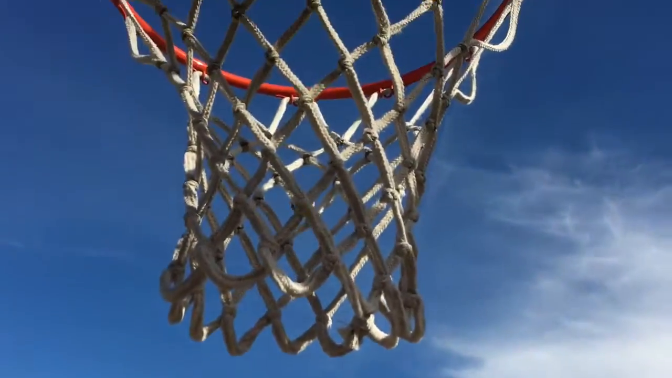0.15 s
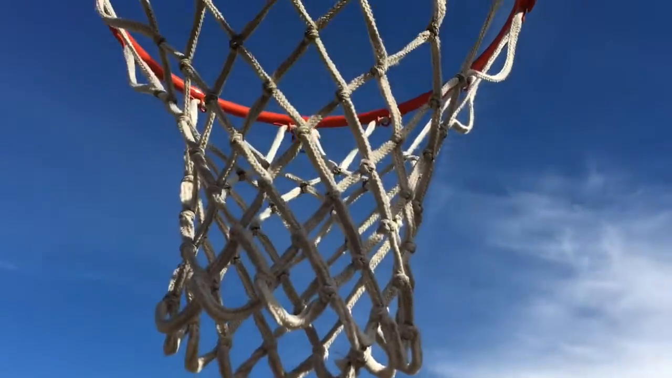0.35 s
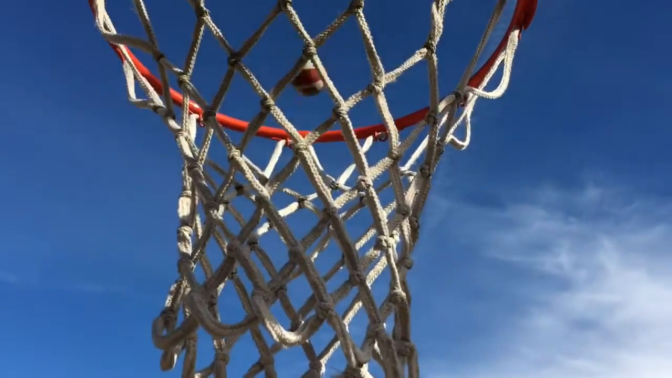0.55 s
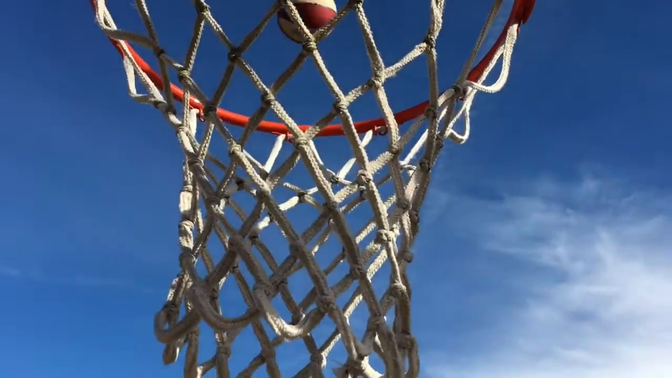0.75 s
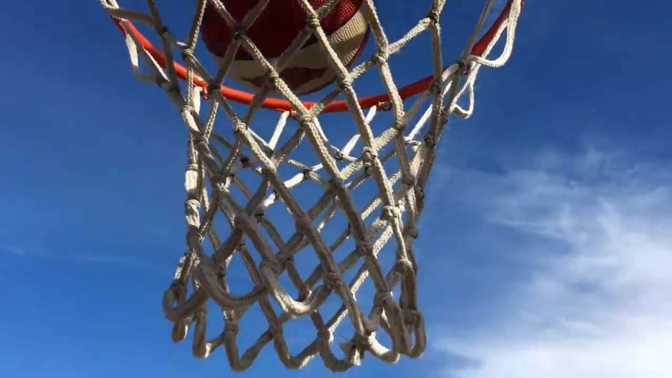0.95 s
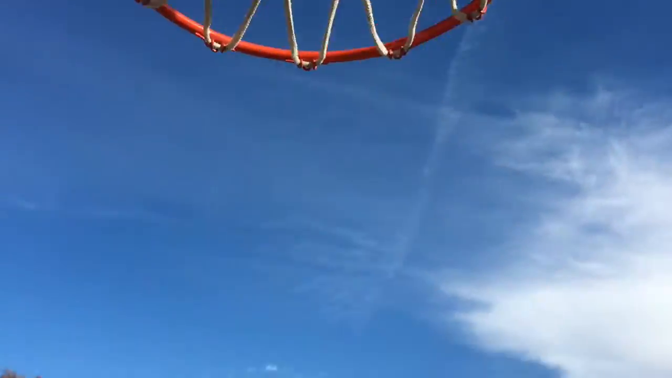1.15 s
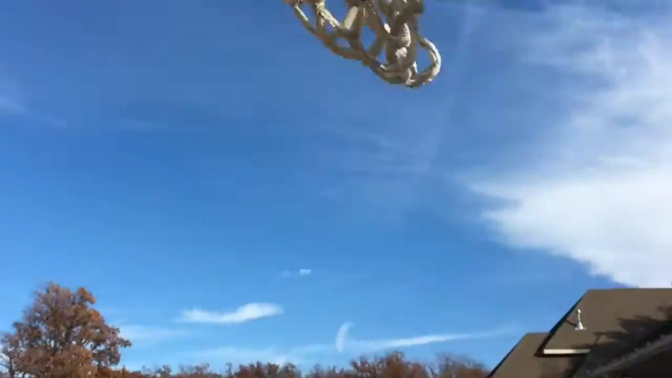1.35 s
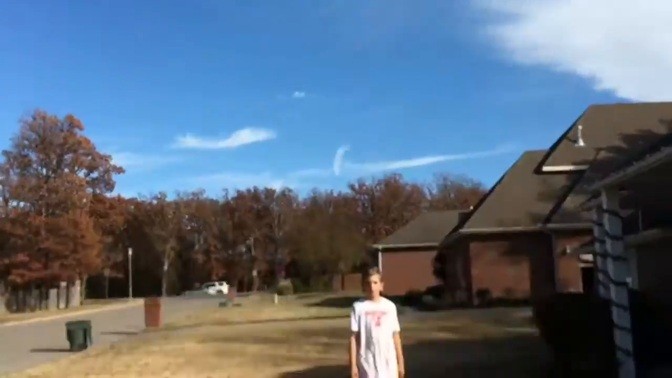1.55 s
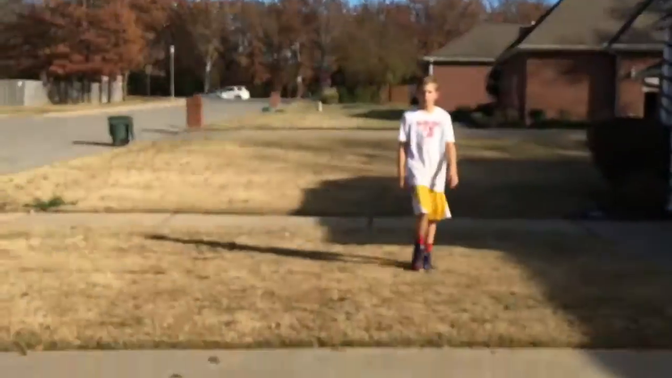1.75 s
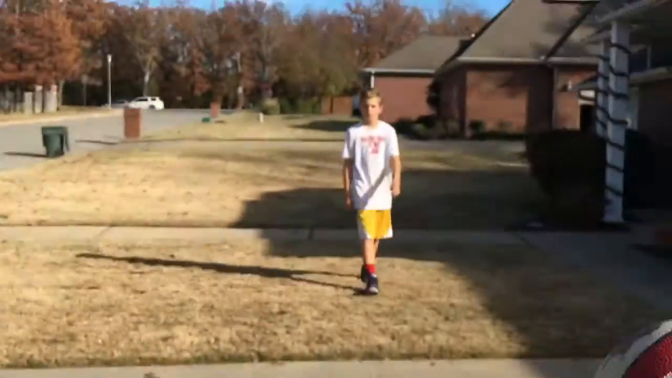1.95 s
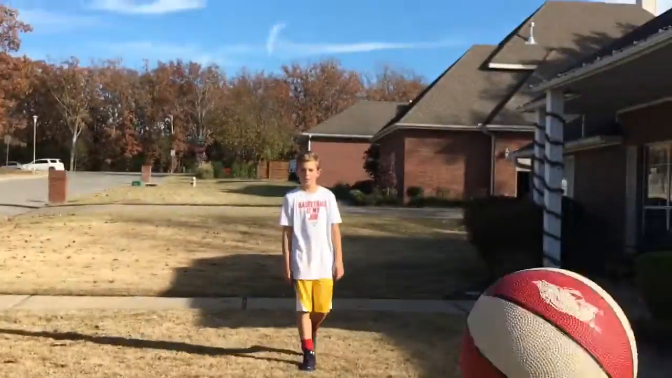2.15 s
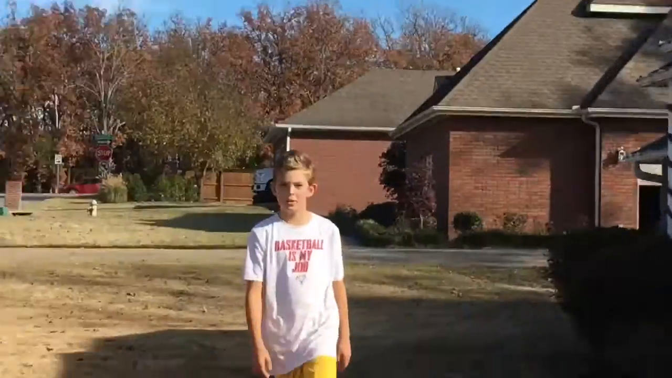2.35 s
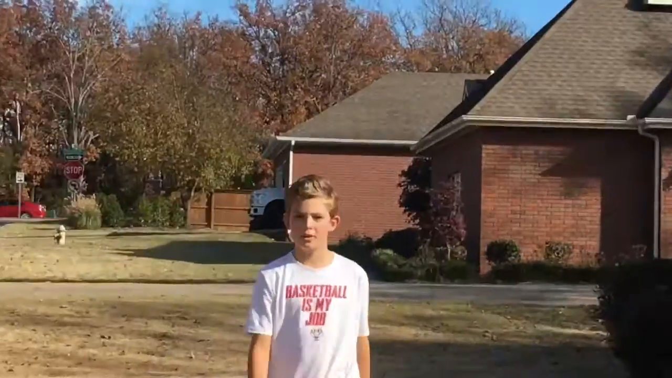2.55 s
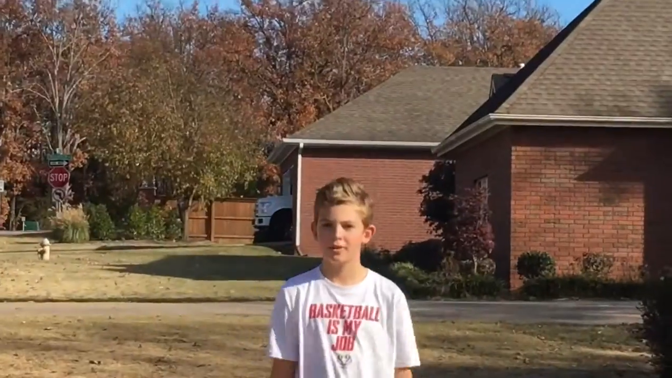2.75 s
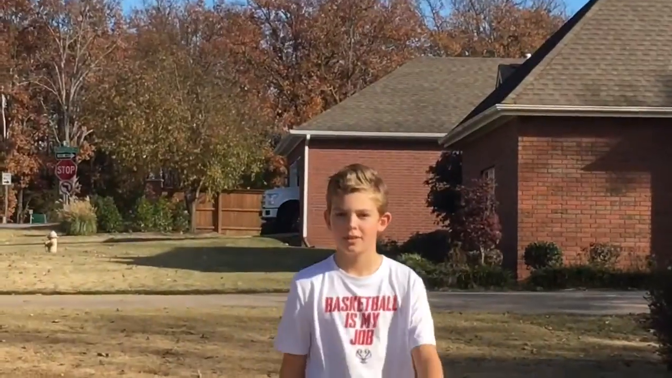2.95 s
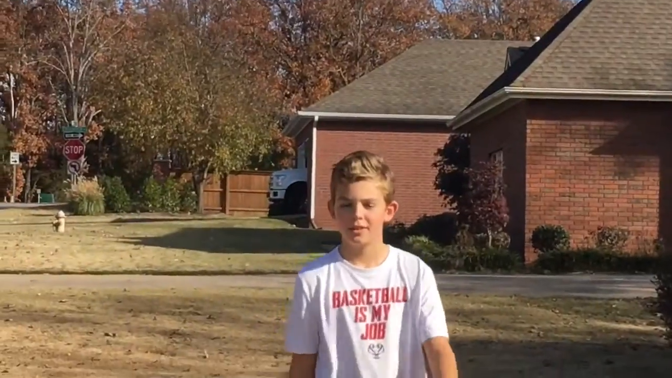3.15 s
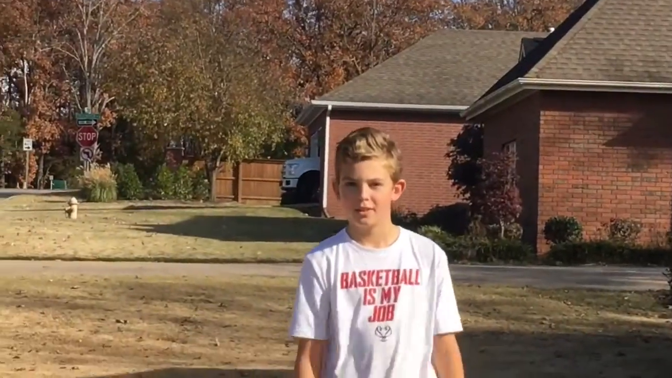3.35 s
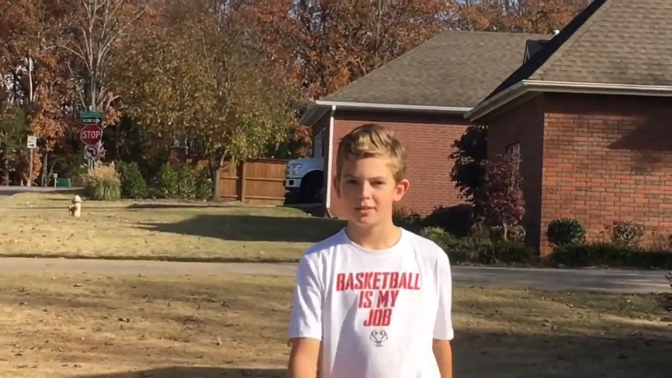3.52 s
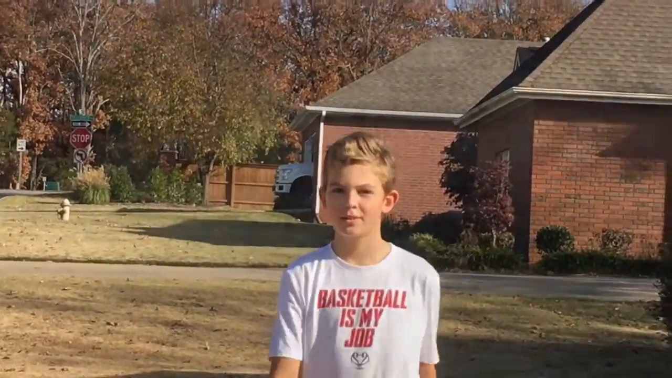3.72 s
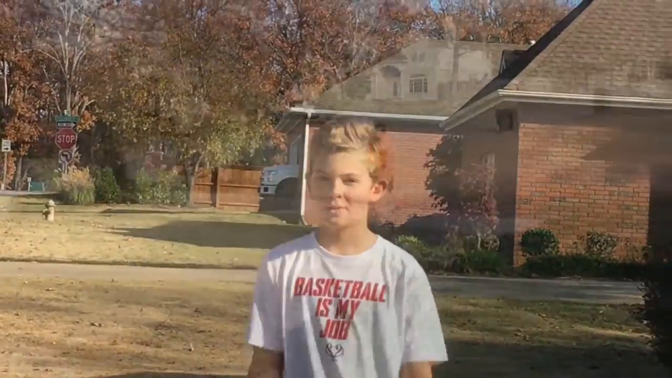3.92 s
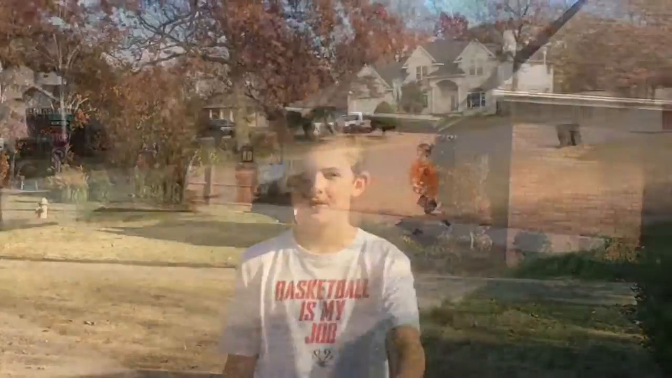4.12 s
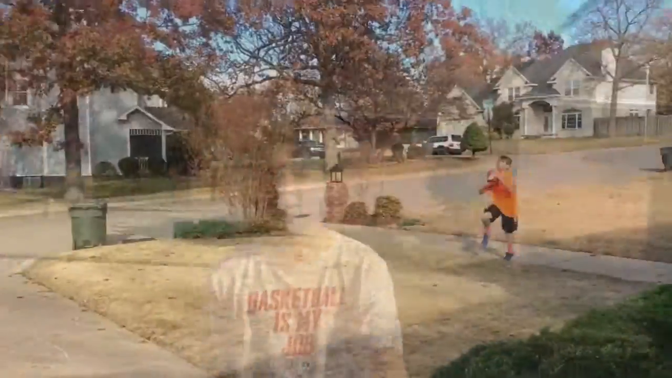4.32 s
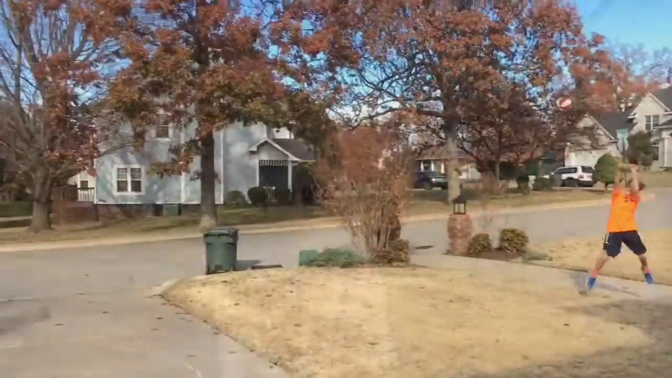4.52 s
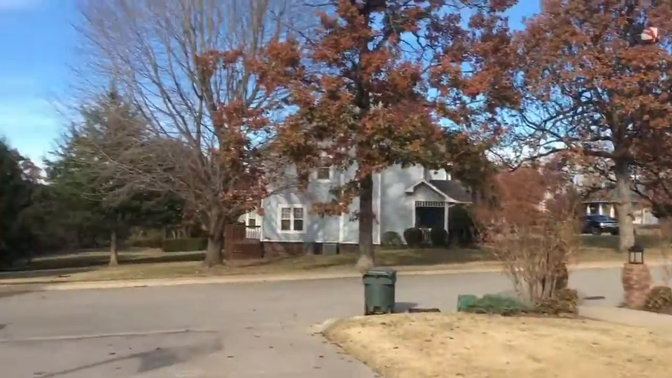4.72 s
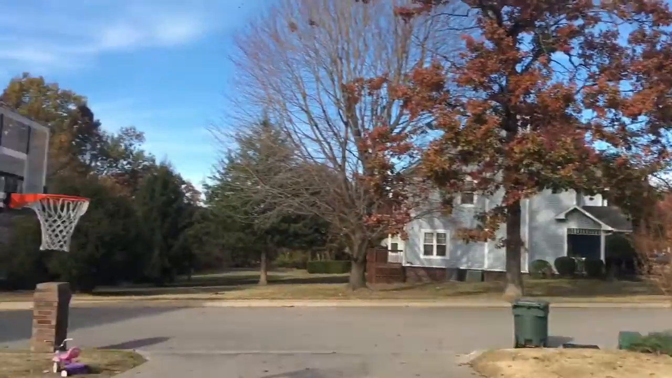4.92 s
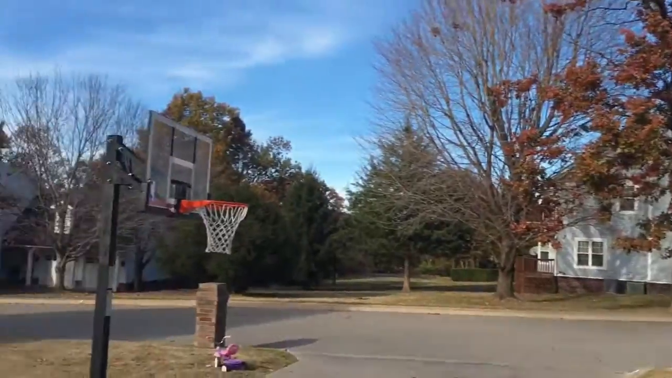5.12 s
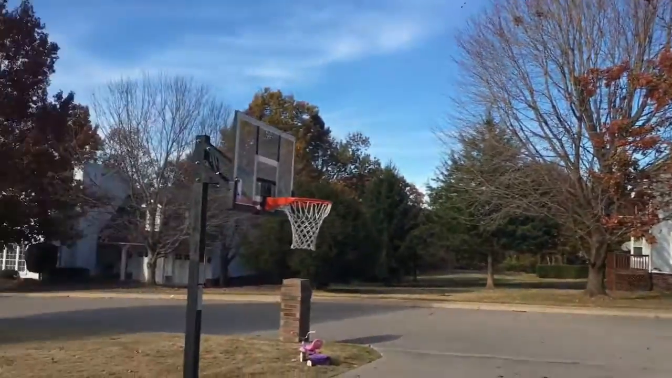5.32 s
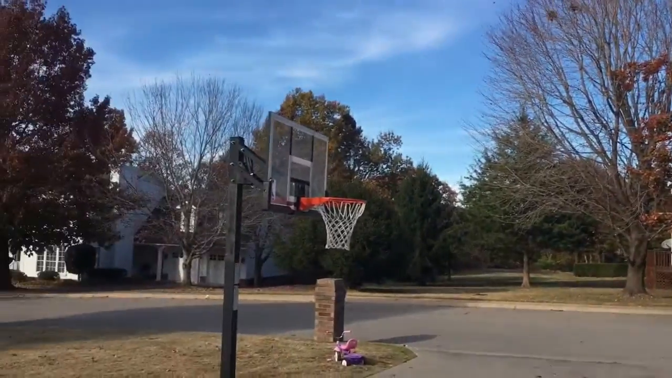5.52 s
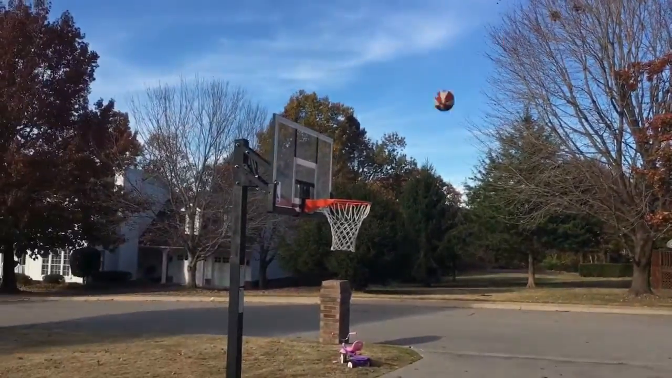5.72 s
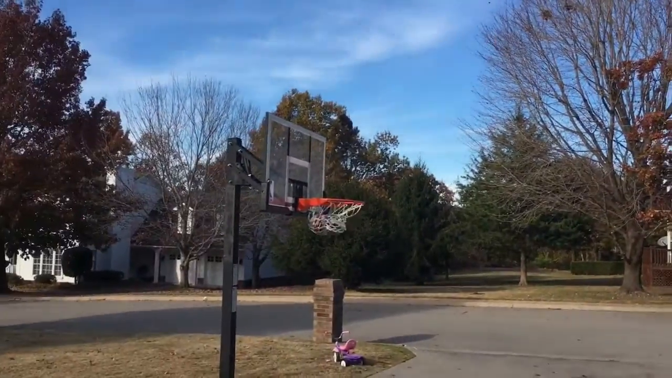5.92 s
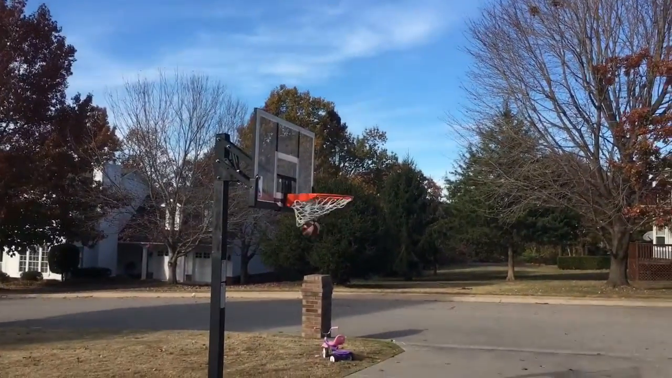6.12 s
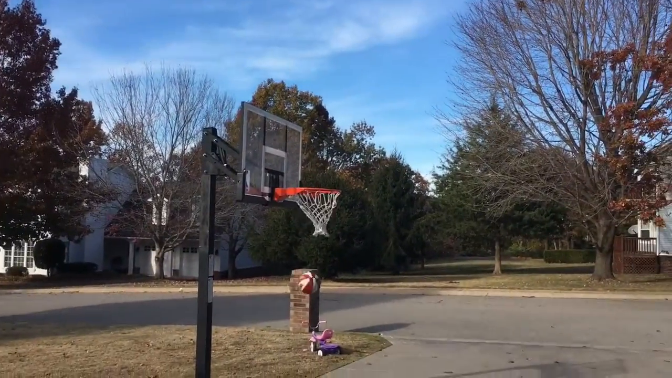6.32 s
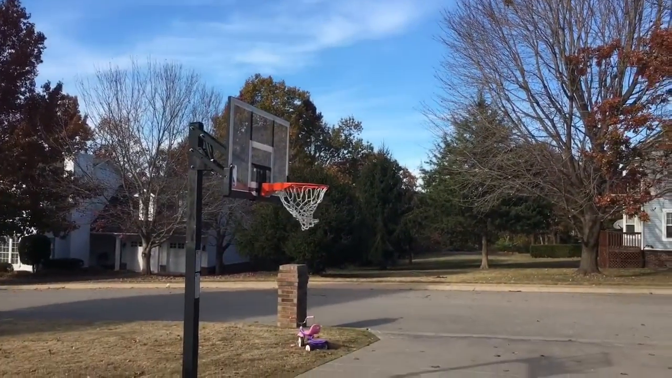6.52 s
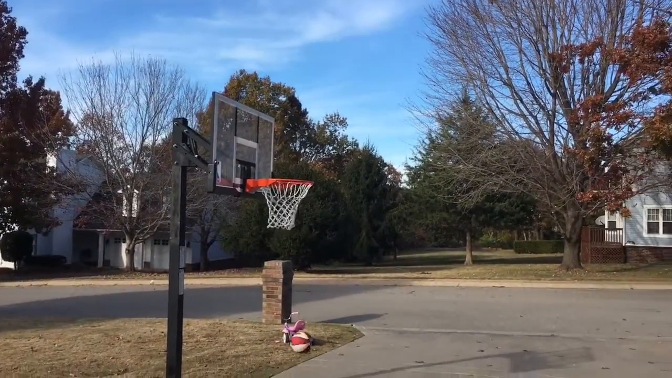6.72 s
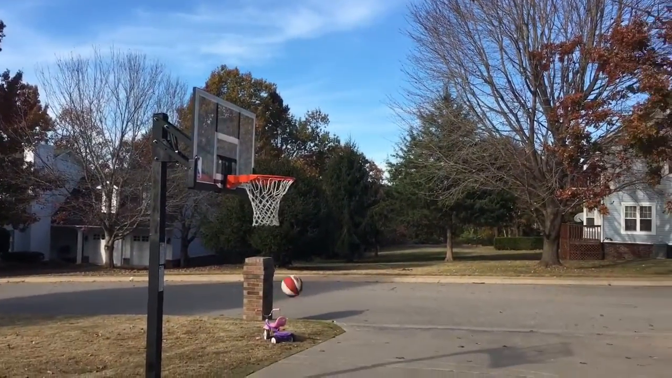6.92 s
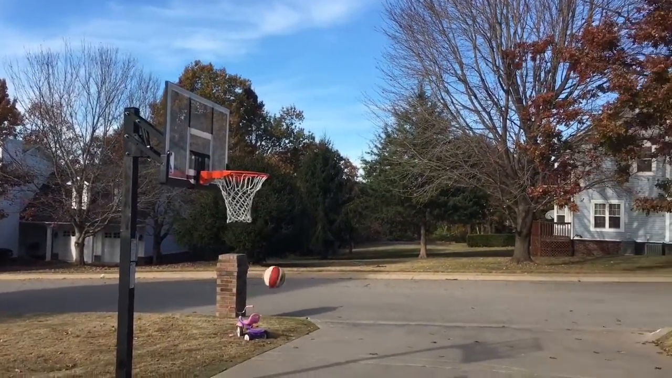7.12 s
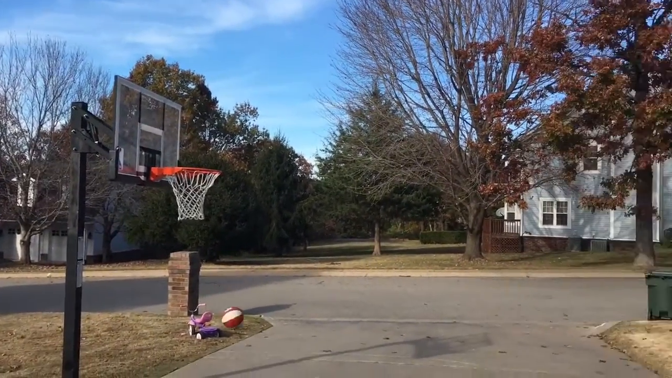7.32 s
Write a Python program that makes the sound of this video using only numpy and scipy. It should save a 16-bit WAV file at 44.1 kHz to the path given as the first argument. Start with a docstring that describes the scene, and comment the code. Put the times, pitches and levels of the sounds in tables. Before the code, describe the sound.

Outdoors, a ball bangs a rim and swishes its net, slaps concrete in quickening bounces, then a fainter hoop rattle and one sharp bounce follow.

```python
"""Wind, traffic, a far motor and a patchy treble hiss are shaped noise throughout; a bird's sliding sine
opens the scene. A basketball strikes a driveway hoop: noise and blows excite rim, net and board, and a
stick-slip squeak sounds. It bounces four times on the concrete, each a slap, air modes and a falling thud,
answered by house walls; thin hoop tones swell around the first bounce, shoes scuff around the fourth.
A weaker second shot then rattles rim and net, bounces once, and is followed by one last scuff."""
import sys
import numpy as np
from scipy import signal
from scipy.fft import rfft, irfft, next_fast_len
from scipy.io import wavfile
from scipy.ndimage import map_coordinates

SR = 44100
rng = np.random.default_rng(int(sys.argv[2]) if len(sys.argv) > 2 else 0)


def transcribe(u):
    """Save the signal u as a 16-bit wav file named by the first command-line argument.

    u: samples, shape (n,) or (channels, n), limited to [-1, 1]; the rate is SR.
    q: integer samples, one column per channel.
    """
    v = np.clip(np.atleast_2d(u).T, -1, 1)
    q = np.round(v * 32767).astype(np.int16)
    wavfile.write(sys.argv[1], SR, q)


N = 325017  # samples


def amp(db):
    """Decibel law: level to amplitude ratio."""
    return 10 ** (np.asarray(db) / 20)


def unit(x):
    """Normalisation to unit root-mean-square amplitude."""
    return x / np.sqrt(np.mean(x ** 2) + 1e-20)


def along(points, hz):
    """Interpolation of (f/Hz, value) points on a logarithmic frequency axis."""
    f, v = np.transpose(points)
    return np.interp(np.log(hz + 1), np.log(f + 1), v)


def gains(rows):
    """Level interpolation in time: one gain curve for each dB column."""
    times, *columns = np.transpose(rows)
    return [amp(np.interp(np.arange(N) / SR, times, levels)) for levels in columns]


def wobble(rate):
    """Random modulation: a smooth curve through `rate` random knots a second."""
    knots = rng.standard_normal(int(N * rate / SR) + 4)
    return map_coordinates(knots, [np.arange(N) * rate / SR])


def filtered(x, response):
    """Linear filtering: the spectrum is multiplied by a frequency response."""
    m = next_fast_len(len(x) + SR // 4)
    spectrum = rfft(x, m) * response(np.fft.rfftfreq(m, 1 / SR))
    return irfft(spectrum, m)[:len(x)]


def shape(points):
    """Spectral envelope drawn through (f/Hz, level/dB) points."""
    return lambda hz: amp(along(points, hz))


def resonant(peaks):
    """Modal superposition: second-order resonances of alternating sign, (f/Hz, width/Hz, level/dB)."""
    def response(f):
        return sum((-1) ** k * amp(db) * 1j * f * width / (centre * centre - f * f + 1j * f * width)
                   for k, (centre, width, db) in enumerate(peaks))
    return response


def noise(response):
    """Coloured noise: filtered white noise of unit rms."""
    return unit(filtered(rng.standard_normal(N), response))


def ring(modes, t):
    """Free vibration: exponentially damped modes, with new strengths at every call."""
    return sum(amp(db + rng.normal(0, 2.) - 60 * t / t60) * np.sin(2 * np.pi * hz * t)
               for hz, db, t60 in modes)


def burst(s, rise, hold, t60):
    """Transient envelope: quadratic rise, hold, then exponential decay by 60 dB in t60."""
    t = np.arange(N) / SR - s
    decay = amp(-60 * np.clip(t - rise - hold, 0, None) / t60)
    return np.clip(t / rise, 0, 1) ** 2 * decay


def add(track, s, sound):
    """Superposition: a sound is summed into the track from time s."""
    part = track[round(s * SR):][:len(sound)]
    part += sound[:len(part)]


# spectrum of wind on the microphone: f/Hz, level/dB
WIND_SPECTRUM = [(12, -19), (22, -14.5), (36, 0), (64, 3), (120, -4.5), (172, -12.5), (204, -15),
                 (300, -31), (400, -55.5)]


def wind():
    """Turbulence: low-frequency noise in irregular lumps."""
    return unit(amp(2.4 * wobble(11)) * noise(shape(WIND_SPECTRUM)))


# resonances of a far motor: f/Hz, width/Hz, level/dB
MOTOR_RESONANCES = [(108, 25, 2), (208, 28, -0.5), (232, 30, -3), (298.5, 8.3, -6.5)]


def motor():
    """Narrow-band noise: each resonance, squared, selects a humming band."""
    def line(hz, width):
        return noise(lambda f: resonant([(hz, width, 0)])(f) ** 2)
    return unit(sum(amp(db) * line(hz, width) for hz, width, db in MOTOR_RESONANCES))


# spectrum of distant traffic: f/Hz, level/dB
TRAFFIC_SPECTRUM = [(150, -26), (250, 0), (513, -7.5), (624, -2.5), (770, -3), (868, 0), (1340, -3),
                    (2100, -9), (2920, -17.5), (3200, -16), (9000, -35), (11700, -56.5), (19800, -120)]


def traffic():
    """Broad-band noise: a wash of distant traffic whose level fluctuates slowly."""
    return amp(.7 * wobble(6)) * noise(shape(TRAFFIC_SPECTRUM))


# spectrum of the treble hiss: f/Hz, level/dB
HISS_SPECTRUM = [(2350, -20), (4000, -2), (5500, -3), (9300, -3.5), (10400, -9), (11400, -5.5),
                 (14000, -6.5), (16000, -7)]
# patches of stronger hiss: start t/s, length t/s, level/dB
HISS_PATCHES = [(0, 0.08, -74), (0.236, 0.093, -68.5), (0.791, 0.041, -70), (1.273, .27, -58),
                (1.74, 0.31, -63.5), (2.546, 0.74, -68.5), (3.085, 0.084, -72), (3.45, 0.33, -68),
                (4.796, 0.357, -67), (5.173, 0.99, -76), (6.693, 0.38, -66.5), (7.266, 0.24, -69.5)]
HISS_BED_DB, HISS_EDGE_S, HISS_T60 = -81.5, 0.017, .2  # dB, rise in s, decay in s


def hiss():
    """Amplitude-modulated noise: treble hiss comes and goes in patches over a faint bed."""
    level = amp(HISS_BED_DB)
    for s, long, db in HISS_PATCHES:
        level = level + amp(db) * burst(s - HISS_EDGE_S, HISS_EDGE_S, long, HISS_T60)
    return level * amp(0.57 * wobble(8.7)) * noise(shape(HISS_SPECTRUM))


# course of the background: t/s, wind level/dB, far motor level/dB, traffic level/dB
AIR_LEVELS = [(0, -41.5, -52, -51.5), (.3, -43, -46.5, -53), (.7, -42, -51, -53.5),
              (1.0, -42, -47.5, -54.5), (1.6, -43, -58.5, -53.5), (2.15, -40, -50, -53.5),
              (2.6, -48.5, -54, -53), (3.3, -49, -58.5, -54), (3.7, -43, -53, -53), (4.1, -51, -66, -57.5),
              (4.6, -44, -71, -54.5), (5.6, -45.5, -72.5, -55.5), (6.7, -43, -56, -56),
              (7.37, -48.5, -69.5, -57.5)]


def street():
    """Incoherent superposition of the background sources, each at its own level."""
    wind_gain, motor_gain, traffic_gain = gains(AIR_LEVELS)
    return wind_gain * wind() + motor_gain * motor() + traffic_gain * traffic() + hiss()


# a far bird's falling note: start t/s, length t/s, from f/Hz, to f/Hz, level/dB
BIRD_NOTE = (0, .21, 5800, 5350, -72)


def bird():
    """Frequency modulation: one unsteady whistle slides down."""
    s, long, from_hz, to_hz, db = BIRD_NOTE
    u = np.clip((np.arange(N) / SR - s) / long, 0, 1)
    pitch = (from_hz + (to_hz - from_hz) * u) * (1 + .015 * wobble(250))
    phase = 2 * np.pi * np.cumsum(pitch) / SR
    return amp(db + 3 * wobble(40)) * (1 - u ** 4) * np.sin(phase)


# wall echoes: delay t/s, level/dB
WALL_ECHOES = [(.0035, -34.5), (.009, -35), (.019, -47.5), (.034, -48), (.046, -49), (.073, -49)]
# decay of the yard by band: f/Hz, t60/s
YARD_DECAY = [(150, 0.119), (1000, 0.216), (4000, 0.37), (12000, 0.19)]


def yard(x):
    """Reverberation: convolution with wall echoes and scattered noise that decays by band."""
    hz, t, z = signal.stft(rng.standard_normal(SR // 2), SR, nperseg=256)
    decay = amp(-60 * t / along(YARD_DECAY, hz)[:, None])
    tail = signal.istft(z * decay, SR, nperseg=256)[1]
    t = np.arange(len(tail)) / SR
    rough = rng.standard_normal(len(t))
    lumps = amp(-14 + 2.5 * wobble(146.0)[:len(t)])
    onset = np.clip((t - .029) / 0.0045, .5, 1)  # half strength, then full with the main wall
    tail = lumps * tail / np.linalg.norm(tail) * onset
    tail += sum(amp(db) * rough * np.exp(-((t - s) / 0.00079) ** 2) for s, db in WALL_ECHOES)
    return signal.fftconvolve(x, tail)[:N]


def echoes(x):
    """Reverberation: each bounce gets the same wall delays, with the noise freshly drawn."""
    out = np.zeros(N)
    for s, *_ in BALL_BOUNCES:
        start = s - .01
        add(out, start, yard(x[round(start * SR):][:SR // 5]))
    return out


# shoe scuffs and ticks: t/s, treble level/dB, body level/dB, length t/s
SHOE_SCUFFS = [(3.85, -79, -58.5, 0.0011), (4.222, -63, -70, 0.00108), (4.2622, -46.5, -56, 0.044),
               (4.556, -66, -61.5, 0.00096), (4.583, -53, -46.5, 0.00069), (6.862, -75, -49, 0.0053)]


def scuffs():
    """Sliding friction: short gritty scrapes over a duller body."""
    grit = sum(amp(db) * burst(s, 0.000578, long, 0.0096) for s, db, _, long in SHOE_SCUFFS)
    sole = sum(amp(db) * burst(s, 0.00071, long, 0.021) for s, _, db, long in SHOE_SCUFFS)
    # f/Hz, level/dB
    treble = [(2000, -15.5), (4500, -7), (6000, 2.5), (9500, -4.0), (11000, -9.0), (16000, -9)]
    body = [(500, -27), (1500, 9.5), (3000, 6), (5000, 0), (9000, -16), (14000, -40)]
    grain = amp(1.4 * wobble(300)) * noise(shape(treble))
    return grit * grain + sole * noise(shape(body))


# thin tones of the steel: f/Hz, level/dB
STEEL_TONES = [(3760, -1), (4620, -3), (5360, -8), (5830, -3), (6200, -8), (7420, -7), (8530, -7)]
# their swells: start t/s, length t/s, level/dB, brightness in dB per octave about 5 kHz
TONE_SWELLS = [(1.33, .22, -63, -1), (1.8, .42, -65, -5)]


def tones():
    """Narrow-band resonance: the shaken hoop's broken tones swell and fade."""
    out = np.zeros(N)
    for hz, level_db in STEEL_TONES:
        line = noise(resonant([(hz, 12, 0)]))  # 12 Hz wide
        for s, long, db, bright_db in TONE_SWELLS:
            u = np.arange(round(long * SR)) / (long * SR)
            gain = amp(db + level_db + bright_db * np.log2(hz / 5000))
            swell = np.sin(np.pi * u ** .6)
            add(out, s, gain * swell * line[round(s * SR):][:len(u)])
    return out


# squeaks of rubber on steel: t/s, level/dB, rise t/s
RUBBER_SQUEAKS = [(1.078, -9, .009), (1.272, -44, 0.025)]
# overtones of the squeak: multiple of the fundamental, level/dB
SQUEAK_OVERTONES = [(1, 0), (2, -7), (3, -18.5)]
SQUEAK_HZ, SQUEAK_HOLD, SQUEAK_T60 = 3140, .002, .028  # mean pitch in Hz, grip in s, release in s
CHATTER_DB, CHATTER_S = -17, .022  # weaker slipping relative to the squeal, its hold in s


def squeak():
    """Stick-slip oscillation: an unsteady harmonic squeal, outlasted by weaker chatter."""
    phase = 2 * np.pi * np.cumsum(SQUEAK_HZ * (1 + 0.0083 * wobble(300))) / SR
    grip = np.zeros(N)
    for s, db, rise in RUBBER_SQUEAKS:
        squeal = burst(s, rise, SQUEAK_HOLD, SQUEAK_T60)
        chatter = amp(CHATTER_DB) * burst(s, rise, CHATTER_S, 2 * SQUEAK_T60)
        grip += amp(db) * (squeal + chatter)
    harmonics = sum(amp(db) * np.sin(k * phase) for k, db in SQUEAK_OVERTONES)
    return grip * amp(1.8 * wobble(250)) * harmonics


# resonances of the backboard: f/Hz, width/Hz, level/dB
BOARD_RESONANCES = [(188, 30, 4.5), (305, 66, -0.5), (379, 56.7, 1)]
BOARD_T60 = 0.569  # s
BOARD_KICK_DB, BOARD_KICK_T60 = -17.5, 0.16  # each knock's share relative to the rim, its decay in s


def board(entry, knocks, level_db, rise_s, hold_s):
    """Plate resonance: low modes shudder at the entry and again under each knock."""
    level = amp(level_db) * burst(entry, rise_s, hold_s, BOARD_T60)
    for s, db, _, rise, _ in knocks:
        level += amp(db + BOARD_KICK_DB) * burst(s, 2 * rise, 0, BOARD_KICK_T60)
    return level * amp(1.2 * wobble(30)) * noise(resonant(BOARD_RESONANCES))


# spectrum of cord on steel: f/Hz, level/dB
CORD_SPECTRUM = [(900, -33.5), (1700, -6), (2800, -2.5), (4000, -4), (6300, -2.5), (9000, -6.5),
                 (12000, -15), (16000, -12.5)]
NET_T60, CORD_SHARE = 0.178, 0.78  # s, cord decay over rim decay


def net(entry, knocks, level_db, drag_s):
    """Friction noise: the net swishes as the ball drags through, and its cord answers each knock."""
    level = amp(level_db) * burst(entry, 0.037, drag_s, NET_T60)
    for s, _, db, rise, t60 in knocks:
        level += amp(db) * burst(s, rise, 0, CORD_SHARE * t60)
    return level * unit(amp(1.8 * wobble(700)) * noise(shape(CORD_SPECTRUM)))


RIM_T60 = 0.995  # decay of the hum, s
CLANG_DB = -2  # one clean blow at the height of each knock, relative to its rattle


def rim(entry, knocks, modes, hum_db, hum_hold):
    """Modal excitation: many tiny contacts rattle the steel, and a clean blow rings it at each knock."""
    level = amp(hum_db) * burst(entry, .01, hum_hold, RIM_T60)
    for s, db, _, rise, t60 in knocks:
        level += amp(db) * burst(s, rise, 0, t60)
    steel = unit(amp(2.2 * wobble(500)) * noise(resonant(modes)))
    clang = filtered(np.eye(1, SR // 8)[0], resonant(modes))  # impulse response
    blows = np.zeros(N)
    for s, db, _, rise, _ in knocks:
        add(blows, s + rise, amp(db + CLANG_DB) * clang / np.abs(clang).max())
    return level * steel + blows


# ball and net knocking the rim: t/s, rim level/dB, cord level/dB, rise t/s
RIM_KNOCKS = [(1.029, -8.5, -18, 0.0021), (1.05, -14, -24, 0.0036), (1.062, -18.5, -36, .004),
              (1.084, -48.5, -30, 0.0119), (1.118, -33, -34.5, 0.021), (1.22, -30, -26, 0.011),
              (1.305, -28.5, -35, 0.0045), (1.335, -38.5, -37.5, 0.00336), (1.365, -38.5, -55, 0.0051),
              (1.475, -44, -55.5, 0.0038), (5.976, -31, -43, 0.00298), (5.983, -33.5, -50, 0.00187),
              (6.007, -26, -46, 0.0022), (6.065, -33.5, -38, 0.017), (6.17, -48, -46.5, 0.0066),
              (6.268, -64, -49, 0.0073)]
# one row per shot: entry t/s, net level/dB, net drag t/s, board level/dB, board rise t/s,
# board hold t/s, rim hum level/dB, rim hum hold t/s
HOOP_SHOTS = [(1.03, -38, 0.089, -35.5, .005, 0.2698, -40, 0.072),
              (5.968, -57.5, 0.13, -46, 0.059, 0.19, -47, 0.11)]
# one list of rim resonances per shot: f/Hz, width/Hz, level/dB
RIM_RESONANCES = [
    [(561, 180, -5.5), (1093, 110, -0.5), (1285, 11, -2), (1420, 190, -3.5), (2340, 400, -8.5),
     (3365, 370, -11)],
    [(368, 76, -3.5), (850, 250, -7.5), (1240, 54, 2.5), (1650, 115, -3.5), (2070, 320, -9),
     (3620, 920, -15)],
]
ENTRY_T60, KNOCK_T60 = .095, 0.06  # decay of a shot's first blow and of the later ones, s


def hoop(shot, modes):
    """Common excitation: the same knocks drive rim, net and board together."""
    entry, net_db, drag, board_db, board_rise, board_hold, hum_db, hum_hold = shot
    own_rows = [row for row in RIM_KNOCKS if abs(row[0] - entry) < 1]
    knocks = [(*row, KNOCK_T60 if k else ENTRY_T60) for k, row in enumerate(own_rows)]
    sound = rim(entry, knocks, modes, hum_db, hum_hold)
    sound += net(entry, knocks, net_db, drag)
    return sound + board(entry, knocks, board_db, board_rise, board_hold)


# ball on concrete: t/s, slap level/dB, brightness in dB per octave about 3 kHz, thud level/dB,
# contact t/ms
BALL_BOUNCES = [(1.6988, -1.5, -1, -4.5, 10.3), (2.645, -3.5, 1.5, -9.5, 10.62),
                (3.4128, -2.5, 3.5, -13.5, 11.2), (4.0571, -12.5, 2.47, -21.5, 11.8),
                (6.662, -2, 4.5, -11.5, 9.75)]
# spectrum of the slap: f/Hz, level/dB
SLAP_SPECTRUM = [(300, -14.5), (1000, 4), (2300, 3), (4800, -5), (6500, -3), (10000, -16.5), (16000, -29.5)]
# modes of the air inside the ball: f/Hz, level/dB, t60/s
BALL_MODES = [(1143, -1, 0.019), (1497, 3, 0.011), (704, -14, 0.031), (2253, -3, 0.022),
              (2954, -14.5, 0.055)]


def slap_click(colour):
    """Impulse with a quadrature phase shift: a dip, then a spike, with `lead` samples before its centre."""
    lead = 200
    click = filtered(np.eye(1, 2 * lead, lead)[0], lambda hz: -1j * colour(hz))
    return lead / SR, click / click.max()


def thud(t, lift):
    """Elastic relaxation: the squashed ball's pitch falls, and suction peaks near lift-off."""
    u = t / lift  # time in units of the contact
    sweep = np.sin(7.8 * np.log(1 + u / .41)) * np.exp(-(u / 1.05) ** 2) * (.5 + 1.07 * u)
    suction = 1.07 * np.exp(-np.abs(u - .96) / np.where(u < .96, .046, .17))  # sudden, then easing
    return sweep - suction


def bounces():
    """Impact radiation: the sharp part (slap, inner ring) and the thud of every bounce."""
    sharp, thuds = np.zeros(N), np.zeros(N)
    t = np.arange(SR // 8) / SR
    for s, slap_db, bright_db, thud_db, contact_ms in BALL_BOUNCES:
        lift = contact_ms / 1000
        colour = lambda hz: amp(along(SLAP_SPECTRUM, hz) + bright_db * np.log2(hz / 3000 + .01))
        lead_s, click = slap_click(colour)
        add(sharp, s - lead_s, amp(slap_db) * click)
        fizz = filtered(rng.standard_normal(len(t)) * amp(-60 * t / 0.016), colour)
        ring_gain = amp(thud_db - 11.5)
        inner_ring = ring_gain * ring(BALL_MODES, t) * rng.choice([-1, 1])
        add(sharp, s, amp(slap_db - 17) * fizz + inner_ring)
        # the skin snaps back on lift-off
        snap = ring_gain * ring(BALL_MODES[:3], t) * (1 - np.exp(-t / 0.00099))
        add(sharp, s + 0.82 * lift, snap)
        add(thuds, s + 0.0014, amp(thud_db) * thud(t, lift))
    return sharp, thuds


STEADY_HZ = 15800  # upper limit of everything but the direct bounces


def scene():
    """Superposition: direct bounces over the band-limited surroundings."""
    sharp, thuds = bounces()
    around = echoes(sharp + amp(3.0) * thuds)
    around += sum(hoop(shot, modes) for shot, modes in zip(HOOP_SHOTS, RIM_RESONANCES))
    around += squeak() + tones() + bird() + scuffs() + street()
    duller = lambda hz: 1 / (1 + (hz / STEADY_HZ) ** 300)
    return (sharp + thuds + filtered(around, duller))[None]


TOP_HZ = 16900  # band limit of the microphone


def record(dry):
    """Transducer limits: the microphone rolls off the bass, rounds high peaks and cuts the top."""
    bass = lambda hz: (1j * hz / (48 + 1j * hz)) ** 2
    x = filtered(dry[0], bass)
    x = x / (1 + np.abs(x / .95) ** 6) ** (1 / 6)  # soft saturation
    return filtered(x, lambda hz: 1 / (1 + (hz / TOP_HZ) ** 150) ** 4)[None]


dry = scene()
out = record(dry)
transcribe(out)
```